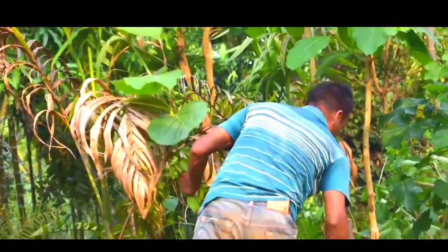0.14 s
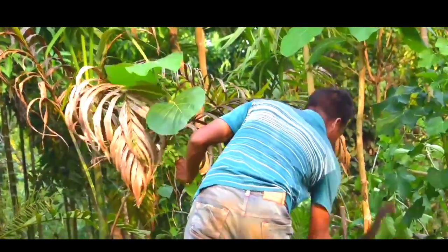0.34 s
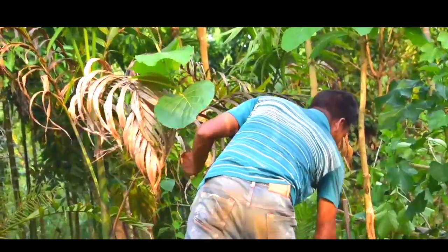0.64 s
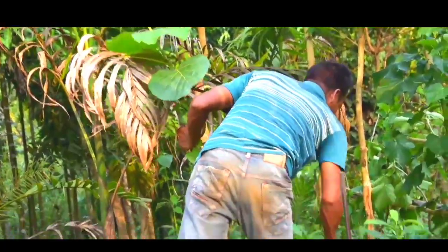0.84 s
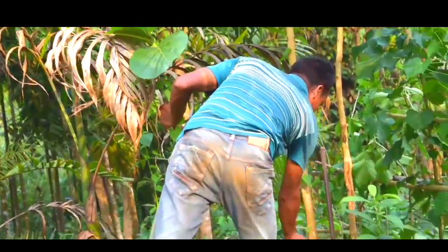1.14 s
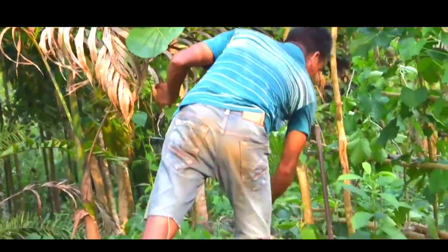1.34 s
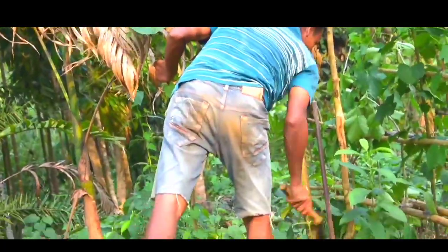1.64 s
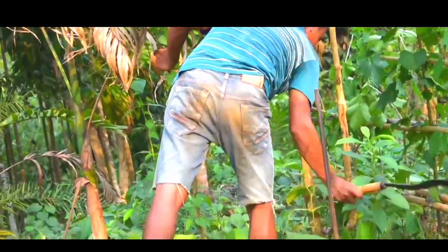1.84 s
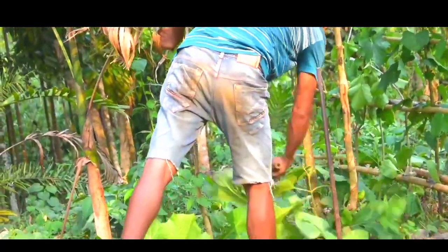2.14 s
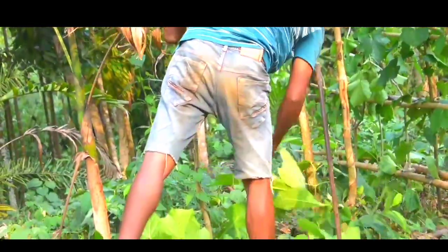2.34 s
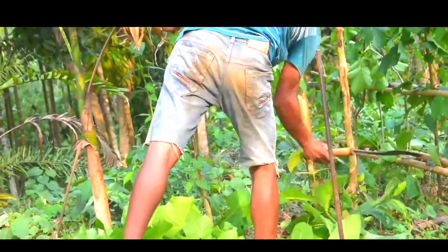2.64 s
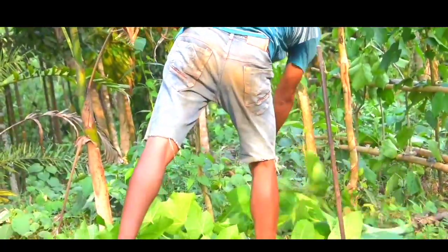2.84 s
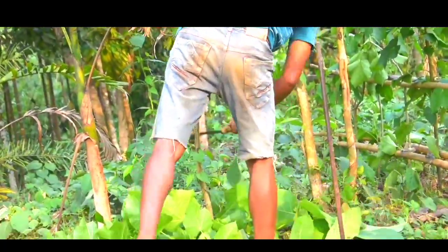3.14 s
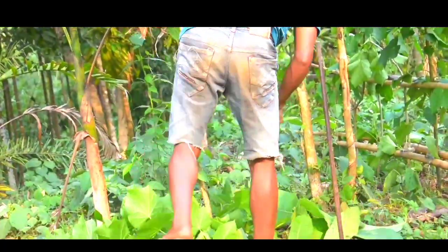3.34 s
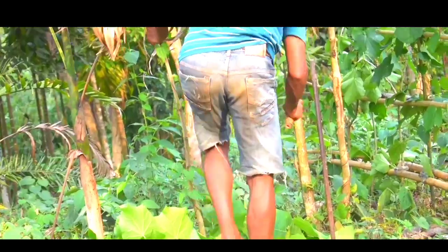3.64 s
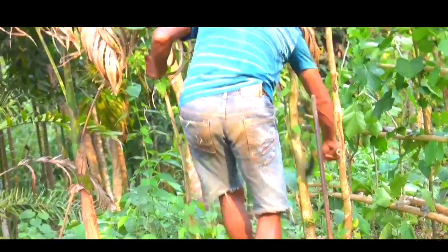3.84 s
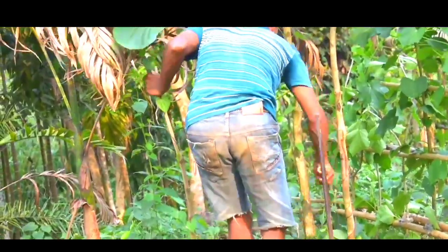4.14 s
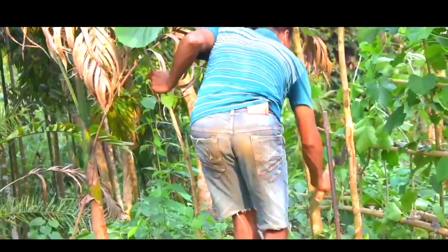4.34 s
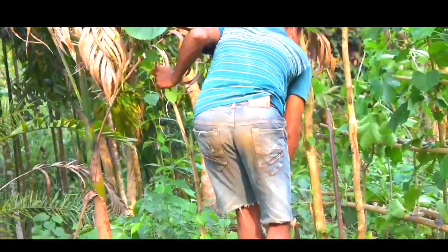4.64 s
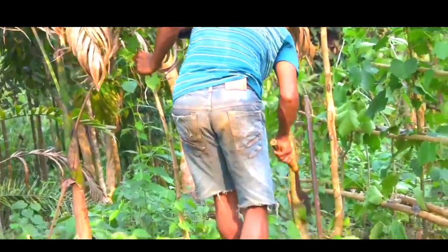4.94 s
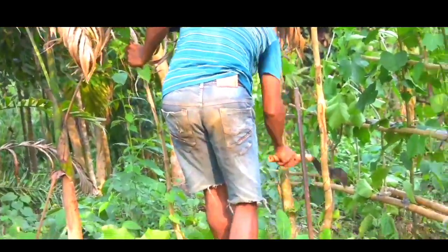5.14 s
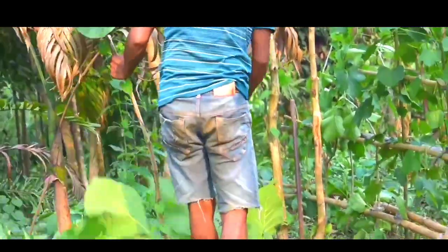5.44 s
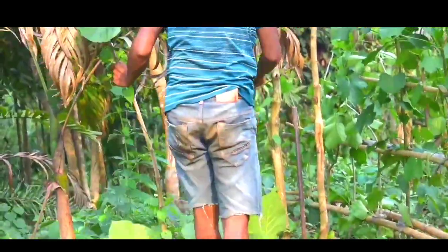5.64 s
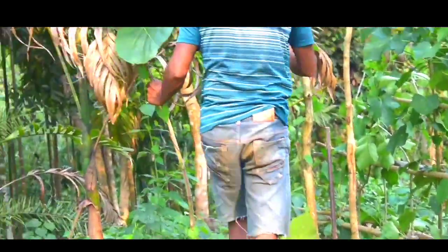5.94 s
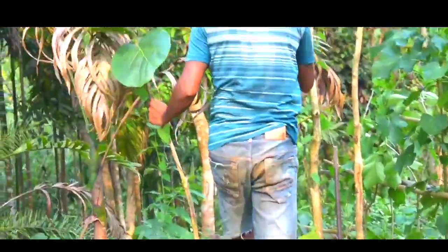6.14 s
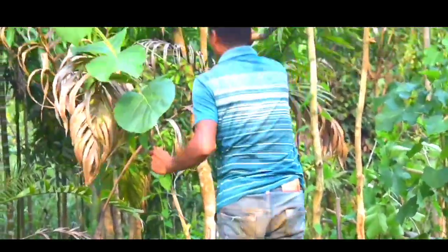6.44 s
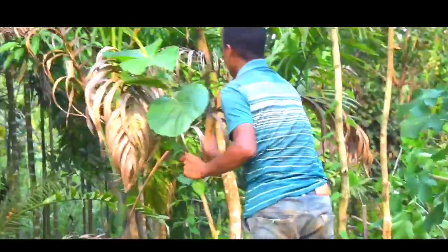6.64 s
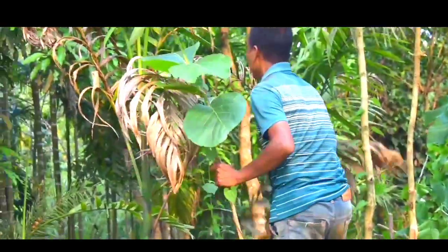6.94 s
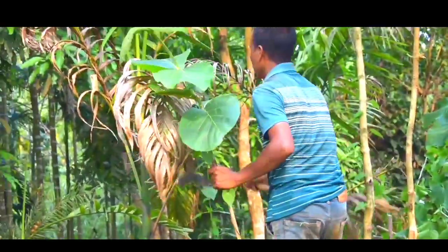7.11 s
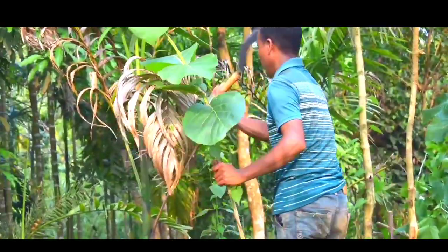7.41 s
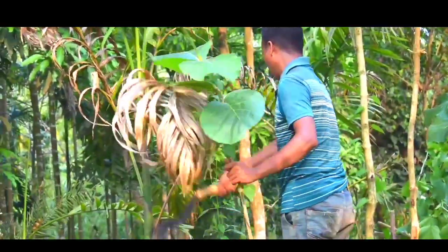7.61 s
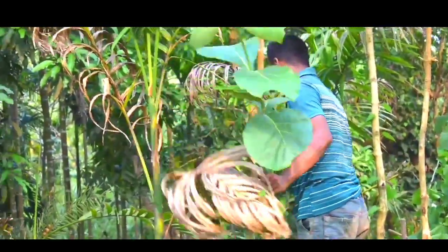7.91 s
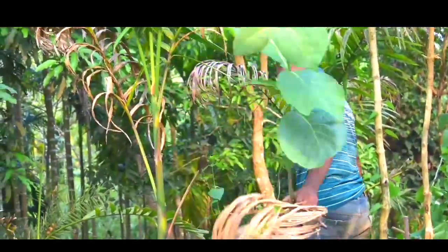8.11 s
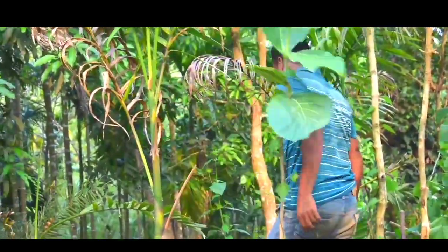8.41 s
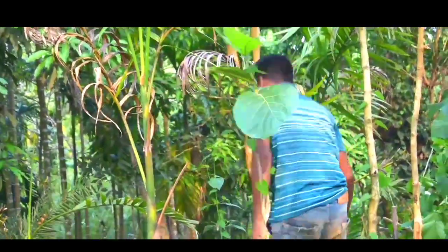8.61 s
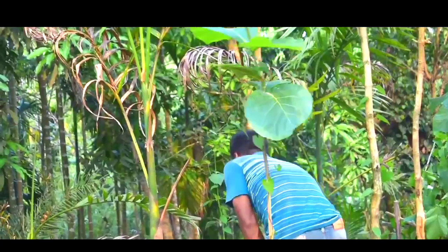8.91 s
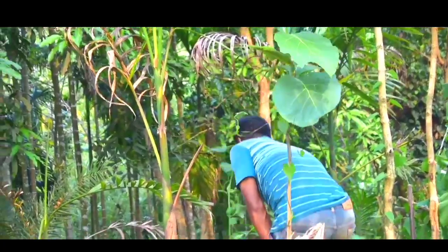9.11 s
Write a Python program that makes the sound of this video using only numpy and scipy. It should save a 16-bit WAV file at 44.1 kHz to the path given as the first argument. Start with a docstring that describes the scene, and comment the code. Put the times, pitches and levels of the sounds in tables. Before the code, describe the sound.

A few metres away in a forest, a machete slashes brush about once a second, each cut a sharp tearing crack with snapping stems and crisp leaf crackle. Midway the blade briefly squeals and rings along a stem. Later come two hard knocks on standing wood, then dragged fronds rustle and a dense final crash of leaves. Faint insects and canopy hiss; dry, centred mono sound.

```python
"""A machete slashes through brush and dry palm fronds a few metres from a mono camera microphone in a forest.
Leaves crackle in dense grains of noise; stems snap in short bursts of noise with decaying tones.
Two hard blows knock on a standing stem, the steel blade rings and once squeals along a stem in short grips.
A pole hums and a far bird chirps as gliding tones; insects and the canopy hiss behind it all as coloured noise."""
import sys
import numpy as np
from scipy import signal
from scipy.fft import rfft, irfft
from scipy.io import wavfile
from scipy.ndimage import uniform_filter1d

SR = 44100
rng = np.random.default_rng(int(sys.argv[2]) if len(sys.argv) > 2 else 0)


def store_pcm(level_fs):
    """Save levels as 16-bit WAV."""
    pcm = np.round(np.clip(level_fs, -1, 1) * 32767).astype(np.int16)
    wavfile.write(sys.argv[1], SR, np.atleast_2d(pcm).T)


N = 408807
TIME = np.arange(N) / SR

# tone colour of crackling leaves as the microphone hears them: pitch_hz [Hz], relative_level_db [dB per Hz]
LEAF_COLOUR = [(880, -36), (1500, -20.5), (1650, -12), (2240, -1.5), (2500, -10.5), (2840, -4.5),
               (3150, -7.5), (3700, -4), (4080, -5.5), (5260, 1.5), (5800, -1), (6220, -5), (6760, -4.5),
               (8000, -17), (10400, -56), (17600, -120)]
# tone colour of the crisp top of dry leaves: pitch_hz [Hz], relative_level_db [dB per Hz]
CRISP_COLOUR = [(6500, -22), (7800, 0), (10000, -4), (13000, -12), (15000, -28), (16000, -36)]


def gain(db):
    """Turn decibels into a factor for the wave's height."""
    return 10 ** (np.asarray(db) / 20)


def unit(x):
    """Scale a signal to an average (rms) level of 1."""
    return x / np.sqrt(np.mean(x ** 2))


def response(spectrum):
    """Filter of energy 1 that never sounds ahead of its input, shaped by points of pitch and level."""
    hz, db = np.transpose(spectrum)
    grid_hz = np.maximum(np.arange(2049) * SR / 4096, 1)
    level_db = np.interp(np.log(grid_hz), np.log(hz), db)
    # folding the cepstrum gives the minimum phase, so the filter acts at once
    cepstrum = irfft(np.log(gain(level_db)))
    cepstrum[1:2048] *= 2
    cepstrum[2049:] = 0
    h = irfft(np.exp(rfft(cepstrum)))[:2048]
    return h / np.sqrt(np.sum(h ** 2))


def colour(x, spectrum):
    """Give a signal the tone colour of a spectrum."""
    return signal.fftconvolve(x, response(spectrum))[:N]


def walk(rate_hz):
    """Random levels with a spread of 1, smoothly joined, with a new one rate_hz times a second."""
    step = int(SR / rate_hz)
    levels = rng.standard_normal(N // step + 1)
    return unit(uniform_filter1d(np.repeat(levels, step), step)[:N])


def grains(rate_hz, spread_db, tail_s):
    """Random tiny cracks, a few much louder than the rest, each a short burst of noise."""
    hit = (rng.random(N) < rate_hz / SR) * gain(spread_db * rng.exponential(size=N))
    keep = np.exp(-1 / (max(tail_s, 1e-4) * SR))
    power = signal.lfilter([1], [1, -keep], hit ** 2)
    return unit(np.sqrt(power) * rng.standard_normal(N))


def ring(x, hz, t60_s):
    """One ringing mode driven by x, dying by 60 dB in t60_s; a steady noise of level 1 comes out about 3 dB lower."""
    pole = np.exp(2j * np.pi * hz / SR - np.log(1000) / (t60_s * SR))
    return np.sqrt(1 - abs(pole) ** 2) * signal.lfilter([1], [1, -pole], x).imag


def swell(t, top_s, rise_s, hold_s, fall_s):
    """Level in dB: up to 0 at top_s, held, then down; rise and fall are times for 20 dB, at least 1 ms."""
    up = 20 * (t - top_s) / max(rise_s, 1e-3)
    down = -20 * (t - top_s - hold_s) / max(fall_s, 1e-3)
    return np.minimum(0, np.minimum(up, down))


def burst(shape, noise, spectrum):
    """Coloured noise under an envelope; the envelope, not chance, sets its energy."""
    x = signal.fftconvolve(shape * noise, response(spectrum))[:len(shape)]
    return x * np.sqrt(np.sum(shape ** 2) / np.sum(x ** 2))


def tone(note, arch, waver_db):
    """A single pitch that glides, swells in an arch and wavers in level."""
    start_s, length_s, first_hz, last_hz, level_db = note
    part = np.clip((TIME - start_s) / length_s, 0, 1)
    phase = 2 * np.pi * np.cumsum(first_hz + (last_hz - first_hz) * part) / SR
    envelope = np.abs(np.sin(np.pi * part)) ** arch * (part < 1)
    return np.sqrt(2) * envelope * gain(level_db + waver_db * walk(60)) * np.sin(phase)


def forest():
    """Far leaves of the canopy hiss steadily, swelling a little."""
    # tone colour of the hiss: pitch_hz [Hz], relative_level_db [dB per Hz]
    canopy_colour = [(15, -56), (25, -20.5), (122, -5.5), (221, -8.5), (290, -9.5), (484, -9.5), (633, -11),
                     (1060, -11), (1460, -15.5), (1670, -11), (1910, -14.5), (3360, -10.5), (3650, -13),
                     (4900, -7), (15600, -47)]
    level_db = -45 + 1.84 * walk(2.92)
    return gain(level_db) * colour(rng.standard_normal(N), canopy_colour)


def insects():
    """A far chorus blurs into a few narrow bands of hiss that drift in level."""
    # bands of the chorus: pitch_hz [Hz], drive_db [dB, middle level of the noise], t60_s [s to die by 60 dB]
    bands = [(3660, -58, 0.088), (5000, -57, 0.034), (5350, -56, 0.024), (5800, -68, .012)]
    return sum(gain(drive_db + 2.0 * walk(3.4)) * ring(rng.standard_normal(N), pitch_hz, t60_s)
               for pitch_hz, drive_db, t60_s in bands)


def bird():
    """A far bird chirps in short gliding tones with soft beginnings and ends."""
    # chirps: start_s [s], length_s [s], first_hz [Hz], last_hz [Hz], level_db [dB ahead of arch and waver]
    chirps = [(0.164, 0.026, 2550, 3110, -29.5), (3.4, 0.051, 1990, 2190, -45),
              (3.48, .035, 2060, 2170, -47), (3.614, .05, 2250, 2300, -42)]
    return sum(tone(chirp, arch=1.7, waver_db=2.5) for chirp in chirps)


def pole_hum():
    """A pole hums in tones that hold nearly steady between a quick swell and a quick fade."""
    # hums: start_s [s], length_s [s], first_hz [Hz], last_hz [Hz], level_db [dB ahead of arch and waver]
    hums = [(2.538, .145, 913, 920, -51.5), (2.69, .065, 913, 932, -48.5)]
    return sum(tone(hum, arch=0.23, waver_db=4.0) for hum in hums)


def squeal():
    """In each grip stick and slip lock to one rate, swell and let go; the next grip starts at a new phase."""
    # grips of a stem along the edge: middle_s [s], length_s [s from the middle to 1/e],
    # second_db, third_db [dB, 2nd and 3rd harmonic]
    grips = [(5.406, 0.021, -41, -53), (5.495, 0.022, -35, -40), (5.526, 0.0091, -25.5, -40),
             (5.539, 0.0077, -27, -35), (5.557, 0.0088, -26, -31), (5.578, 0.0095, -21, -33),
             (5.596, 0.0088, -22, -33), (5.627, .018, -29.5, -37), (5.656, 0.013, -38, -37),
             (5.682, 0.018, -38.5, -44), (5.733, 0.011, -36, -43), (5.751, 0.014, -34.5, -50),
             (5.81, 0.023, -37, -56), (5.9, .016, -45, -59), (5.86, .014, -46, -58), (5.986, .02, -50, -60),
             (6.06, .025, -51, -58)]
    slip_hz, slip_spread, first_re_second_db = 836.6, .005, -17
    out = np.zeros(N)
    chance = rng.standard_normal((len(grips), 4))
    for (middle_s, length_s, second_db, third_db), (tune, *start) in zip(grips, chance):
        i = slice(int((middle_s - .1) * SR), int((middle_s + .1) * SR))
        t = TIME[i] - middle_s
        hz = slip_hz * (1 + slip_spread * tune)
        envelope = np.exp(-(t / length_s) ** 2)
        for k, db in enumerate((second_db + first_re_second_db, second_db, third_db)):
            out[i] += gain(db) * envelope * np.sin(2 * np.pi * ((k + 1) * hz * t + start[k]))
    roughness = 1 + .35 * walk(250)
    return out * roughness


def blade(brush):
    """The steel rings in its bending modes when dragged over wood, and faintly whenever brush hits it."""
    # bending modes of the steel: pitch_hz [Hz], relative_level_db [dB], t60_s [s to die by 60 dB]
    modes = [(1547, 1.5, 0.12), (1620, -6.5, 0.34), (2750, 1, 0.14), (3144, 3, 0.072), (3780, -2.5, 0.45)]
    # one drag over wood: top_s [s], drive_db [dB], hold_s [s], fall_s [s for 20 dB]
    top_s, drive_db, hold_s, fall_s = (5.5, -46.5, 0.16, .5)
    drag = gain(drive_db + swell(TIME, top_s, 0.0054, hold_s, fall_s))
    hits = gain(-30.5) * brush
    out = np.zeros(N)
    for pitch_hz, level_db, t60_s in modes:
        drive = drag * grains(300, 1.6, 0.0015) + hits
        out += gain(level_db) * ring(drive, pitch_hz, t60_s)
    return out


def chops():
    """The edge bites for a few ms: fibres crack, the stem knocks, and its whole length rings low a little later."""
    # hard blows into a standing stem: hit_s [s], level_db [dB], wood_db, deep_db [dB re level_db],
    # bite_s [s from the start to the peak], low_hz [Hz, the knock sounds above it]
    blows = [(6.798, -2, -6.5, -28, 0.002, 470), (7.6136, -1, -7, -48, 0.0023, 960)]
    # ringing modes of the knock: pitch_hz [Hz], relative_level_db [dB], t60_s [s to die by 60 dB]
    trunk_modes = [(655, -27, 0.055), (1000, -13, 0.05), (1345, 4, 0.014), (1815, 5, 0.012),
                   (2200, -14, .035)]
    # low ring of the whole stem: pitch_hz [Hz], t60_s [s to die by 60 dB]
    deep_hz, deep_t60_s = (235, 0.26)
    t = np.arange(4096) / SR
    crack, wood = np.zeros((2, N))
    chance = rng.standard_normal((len(blows), 2, len(t)))
    for (hit_s, level_db, wood_db, deep_db, bite_s, low_hz), (fibres, push) in zip(blows, chance):
        first = int((hit_s - .001) * SR)
        i = slice(first, first + len(t))
        bite = t / bite_s * np.exp(1 - t / bite_s)
        crack[i] = gain(level_db - 5.5) * burst(bite, fibres, LEAF_COLOUR)
        crack[i] += gain(level_db - 18) * burst(bite, fibres, CRISP_COLOUR)
        knock = sum(gain(db) * ring(bite * push, hz, t60_s) for hz, db, t60_s in trunk_modes)
        knock = signal.sosfilt(signal.butter(4, low_hz, "high", fs=SR, output="sos"), knock)
        # the knock gets the energy of the bite
        knock *= np.sqrt(np.sum(bite ** 2) / np.sum(knock ** 2))
        arch = np.sin(np.pi * t / t[-1]) ** 0.78
        deep = gain(deep_db - 60 * t / deep_t60_s) * arch * np.sin(2 * np.pi * deep_hz * t)
        wood[i] = gain(level_db) * (gain(wood_db) * knock + deep)
    return crack + wood


def crisp_db():
    """How dry and bright the leaves in motion are, as a level in dB that drifts with time."""
    # crisp top of the leaves: time_s [s], level_db [dB re the rustle]
    crisp_points = [(0, -17), (.5, -20), (1.3, -16), (1.7, -14), (2.2, -16.5), (2.9, -16.5), (3.4, -17.5),
                    (4.0, -14.5), (4.4, -15.5), (4.9, -12.5), (5.4, -16.5), (6.0, -17.5), (6.45, -17.5),
                    (6.85, -15.5), (7.3, -15.5), (8.0, -16.5), (8.6, -16), (9.27, -16)]
    return np.interp(TIME, *np.transpose(crisp_points))


def snaps():
    """Each break is a tearing burst with a weaker shiver of leaves after it; twig and stem ring briefly."""
    # snaps and blows: hit_s [s], level_db [dB], stem_hz [Hz], stem_db [dB re level_db],
    # twig_hz [Hz], twig_db [dB re level_db]
    breaks = [(0.1663, -18, 334, -27, 1010, -6.5), (.1762, -17, 266, -26, 1140, -17),
              (.192, -16, 366, -38, 1650, -12), (0.3676, -18.5, 490, -28, 939, -18),
              (.408, -22.5, 357, -25, 1480, -7.5), (0.495, -10, 385, -27, 1070, -4),
              (0.5185, -8, 444, -29, 1020, -16), (1.2453, -9.5, 372, -17, 1620, -9),
              (1.2579, 1, 281, -14, 990, -17), (1.271, 1, 221, -34, 1690, -17),
              (2.0667, -4.5, 450, -27, 1200, -31), (2.0843, -0.4, 436, -28, 1750, -11),
              (2.0999, 5, 407, -25.5, 1150, -19), (2.202, -10, 425, -36, 1260, -23),
              (2.5096, -17, 361, -23, 1310, -10), (2.5804, -14, 312, -33, 926, -26),
              (2.6464, -23, 395, -29, 894, -17), (2.8285, -8, 371, -32, 1700, -36),
              (2.8484, -2.5, 385, -16, 1700, -25), (2.8665, -1, 453, -24, 1600, -14),
              (2.8903, -5, 353, -27, 1790, -7), (3.084, -21, 350, -28.5, 1300, -22),
              (3.3494, -18.5, 207, -22, 1740, -11), (3.639, -19, 371, -32, 1160, -22),
              (3.8262, -16.5, 417, -36, 1290, -11), (3.8672, 1.5, 477, -44, 1080, -27),
              (3.976, -7.5, 312, -15.5, 1500, -29), (3.9869, -0.5, 348, -36, 1240, -26),
              (3.9994, -1.5, 408, -43, 960, -23), (4.0209, -5, 466, -40, 840, -10),
              (4.0314, -7, 466, -37, 1620, -14), (4.051, -7.5, 377, -38, 1530, -11),
              (4.0805, -2.5, 368, -44, 1220, -11.5), (4.1162, -6.5, 450, -41, 1530, -11),
              (4.3452, -8, 310, -41, 1300, -10), (4.3896, -13.5, 266, -35, 1200, -19),
              (4.4176, -15.5, 420, -23, 1680, -16), (4.5342, -19, 374, -16, 1350, -6),
              (4.596, -4.5, 296, -30, 1300, -15), (4.624, -9, 350, -31, 1200, -25),
              (4.6752, -20, 444, -35, 1680, -7), (4.71, -8, 275, -33, 1000, -24),
              (5.0615, -22.5, 288, -29, 840, -22), (5.4234, -19, 221, -15, 1080, -17),
              (5.4439, -18, 415, -31, 1680, -16), (5.4596, -11.5, 470, -24, 950, -21),
              (6.1436, -16, 403, -35, 1670, -26.5), (6.34, -7.5, 370, -22.5, 1750, -16),
              (6.3667, -2, 450, -22.5, 740, -12.5), (6.373, -9, 527, -22, 1350, -9),
              (6.4008, -12, 515, -32, 1090, -12), (6.4132, -7, 253, -38, 1620, -5.5),
              (6.431, -10, 476, -43, 1470, -15.5), (6.4533, 1, 280, -46, 1340, -19),
              (6.4804, -4.5, 425, -33, 1370, -5.5), (6.498, -6, 366, -27, 1310, -13),
              (6.554, -17, 369, -31, 1500, -19.5), (6.6398, -14, 191, -28, 1070, -21),
              (6.6868, -18, 253, -28, 1060, -24), (7.0305, -23, 304, -24.5, 1040, -12),
              (7.0616, -19.5, 401, -17, 1580, -18), (7.5193, -14.5, 194, -37, 1460, -14),
              (7.8171, -17.5, 194, -29.5, 1290, -16), (8.1769, -18, 191, -5.5, 1255, -2),
              (8.181, -22.5, 402, -5, 760, -0.5), (8.2727, -19, 361, -19, 894, -24),
              (8.332, -20, 490, -30, 1400, -13), (8.3532, -18, 378, -18, 1520, -25),
              (8.4791, -20, 258, -13.5, 1330, -19), (8.7643, -5.5, 352, -28, 1390, -20),
              (9.065, -13, 364, -18.5, 1290, -21), (9.1158, -5.5, 393, -27, 1540, -11.5),
              (9.1473, 0.5, 264, -22, 1280, -14.5), (9.1611, 0, 324, -14.5, 1370, -23),
              (9.1774, -4, 450, -18, 1370, -19)]
    rise_s, shiver_db, shiver_slower = .0003, -16, 6.4
    second_hz, second_db = 2124, -2  # higher ring at one fixed pitch, its level relative to the twig
    t = np.arange(8192) / SR
    chance = rng.standard_normal((len(breaks), 2, len(t)))
    tear, top, wood = np.zeros((3, N + len(t)))
    fall_db = -60 * t / 0.021  # the tear dies by 60 dB in 21 ms
    rise = 1 - np.exp(-t / rise_s)
    shape = rise * (gain(fall_db) + gain(shiver_db + fall_db / shiver_slower))
    for (hit_s, level_db, stem_hz, stem_db, twig_hz, twig_db), (noise, splinter) in zip(breaks, chance):
        first = int((hit_s - rise_s) * SR)
        i = slice(first, first + len(t))
        tear[i] += gain(level_db) * burst(shape, noise, LEAF_COLOUR)
        top[i] += gain(level_db) * burst(shape, noise, CRISP_COLOUR)
        # splintering fibres roughen the twig's ring
        rough = 1 + 2.05 * uniform_filter1d(splinter, size=24)
        twig = gain(twig_db + fall_db / 0.73) * rough * np.sin(2 * np.pi * twig_hz * t)
        second = gain(twig_db + second_db + fall_db / 0.83) * np.sin(2 * np.pi * second_hz * t)
        stem = gain(stem_db + fall_db / 1.94) * np.sin(2 * np.pi * stem_hz * t)
        wood[i] += gain(level_db) * rise * (twig + second + stem)
    # the microphone passes little deep bass
    wood = signal.sosfilt(signal.butter(2, 140, "high", fs=SR, output="sos"), wood[:N])
    return gain(-10.5) * tear[:N] + gain(-7.5 + crisp_db()) * top[:N] + wood


def strokes():
    """Levels in dB of leaves, stems and twigs over time: rustles and slashes add in power."""
    # leaves set in motion by arm, foot, backswing or a pulled frond: top_s [s], level_db [dB],
    # rise_s [s for 20 dB], hold_s [s], fall_s [s for 20 dB], thud_db, knock_db [dB re level_db, stems and twigs]
    rustles = [(0.0, -38.5, .01, 0.003, 0.1, -19, -8), (0.125, -31.5, .13, 0.032, 0.15, -19, -12),
               (0.406, -44, -1, .03, 3, -19, -9), (0.823, -37.5, 0.35, 0.039, .35, -19, -19),
               (1.19, -44.5, 1, .02, 2, -16, -16), (1.44, -40.5, 0, 0.017, 0.4, -15, -16),
               (1.646, -27.5, 0.18, 0.045, 0.13, -17.5, -15), (1.85, -47, 0, .15, 1, -15, -12),
               (2.199, -19.5, 0.03, 0.01, 0.08, -17, -12.5), (2.3, -37.5, 0.3, 0.014, 0.2, -18, -18),
               (2.54, -38, 0.1, 0.022, 0.2, -14.5, -12.5), (2.79, -42.5, .3, 0.051, 0.86, -17, -10),
               (3.06, -42, -0.2, 0.0092, 1, -24, -23), (3.35, -40.5, -0.2, .006, -0.24, -11, -19),
               (3.434, -42.5, 0.8, 0.0088, 0, -16, -25), (3.582, -43, 0, .02, .1, -15, -12),
               (3.617, -35.5, -0.05, 0.012, 0.35, -23, -16), (3.81, -32, 0.1, 0.004, .1, -16, -15.5),
               (3.904, -30, 0.05, .03, 0.24, -11, -15), (3.971, -20.5, 0.11, 0.0062, 0.19, -17.5, -15.5),
               (4.078, -30, 0.06, 0.02, 0.35, -31, -11.5), (4.349, -35, 0.1, .035, 0.17, -31, -7.5),
               (4.577, -28, 0.1, .012, 0, -15, -12.5), (4.671, -26.5, -0.03, 0.026, 0.5, -22.5, -16.5),
               (4.9, -36.5, 0.1, 0.06, 0, -22, -31.5), (5.055, -36.5, -1.8, 0.011, -0.55, -22, -20),
               (5.398, -35, -0.03, 0.022, .1, -20, -19), (5.436, -27, 0.03, 0.037, 0.02, -19, -17),
               (5.658, -35.5, .4, 0.0067, 0.42, -18.5, -11.5), (6.163, -38, 0.34, .01, 0.3, -20, -13.5),
               (6.323, -32.5, 0.12, 0.047, -0.06, -12, -10.5), (6.433, -25, 0.07, 0.037, 0.18, -32, -12.5),
               (6.6, -38.5, 0.2, .12, 0.5, -21, -15), (6.945, -35, 0.15, 0.23, 1, -20, -14.5),
               (7.251, -23.5, 0.24, 0.011, 0.2, -18, -16.5), (7.522, -33.5, 0.2, .01, 0.06, -28, -18.5),
               (7.686, -31, 0.27, 0.11, 0.53, -26.5, -13.5), (8.081, -36.5, 0, 0.04, 0.2, -30, -16),
               (8.173, -34, 0.35, 0.05, 0.15, -17.5, -16.5), (8.272, -35, .08, 0.011, 0.5, -20, -17),
               (8.348, -25.5, -0.07, 0.039, 0.15, -22, -16), (8.472, -34.5, -0.1, .02, .2, -18, -13),
               (8.542, -27, 0.15, 0.23, 0.05, -19, -16.5), (8.788, -20.5, 0.1, 0.021, 0.1, -21, -16),
               (8.91, -40, -4, 0.061, .4, -21, -16), (8.986, -32.5, 0.1, 0.027, 0.4, -19.5, -15),
               (9.151, -13, 0.03, 0.0089, 0.18, -14, -10.5), (9.224, -16, -0.0161, .008, 0, -30, -16)]
    # slashes of the blade through brush: top_s [s], level_db [dB], hold_s [s], fall_s [s for 20 dB],
    # thud_db, knock_db [dB re level_db, stems and twigs]
    slashes = [(0.493, -18.5, 0.067, 0.21, -14.5, -13.5), (1.241, -19, .05, .2, -12.5, -12.5),
               (2.071, -17.5, 0.047, 0.13, -16.5, -12), (2.832, -15.5, 0.062, 0.1476, -16.5, -15),
               (4.595, -17.5, 0.011, .1, -18, -16), (6.806, -24.5, .012, 0.18, -25, -10.5),
               (7.619, -19, .007, 0.07, -14, -14), (9.068, -23.5, .035, 3, -21, -20)]
    slash_rise_s = .004  # for 20 dB
    moves = rustles + [(top_s, level_db, slash_rise_s, *rest) for top_s, level_db, *rest in slashes]
    t = TIME[::32]
    power = np.full((3, len(t)), 1e-12)
    # stems and twigs rise and fall more steeply in dB than the leaves
    steep = np.array([[1], [1.27], [1.09]])
    for top_s, level_db, rise_s, hold_s, fall_s, thud_db, knock_db in moves:
        shape = gain(swell(t, top_s, rise_s, hold_s, fall_s))
        levels_db = level_db + np.array([[0], [thud_db], [knock_db]])
        power += (gain(levels_db) * shape ** steep) ** 2
    return [np.interp(TIME, t, 10 * np.log10(p)) for p in power]


def leaves():
    """Moved and slashed leaves, twigs and stems crackle in clusters that they all share."""
    # tone colour of the stems' thud: pitch_hz [Hz], relative_level_db [dB per Hz]
    thud_colour = [(40, -33), (90, -15), (150, -6), (220, -3.5), (320, -0.5), (420, 0.5), (520, -10.5),
                   (700, -25.5)]
    # tone colour of the twigs' knock: pitch_hz [Hz], relative_level_db [dB per Hz]
    knock_colour = [(450, -32), (700, -2.5), (1000, 3.5), (1300, 3.5), (1600, 2.5), (2000, -26)]
    rustle_db, thud_db, knock_db = strokes()
    cluster_db = 0.72 * walk(70) + 0.54 * walk(20)
    crackle = gain(rustle_db + cluster_db) * grains(3500, 1.6, .0009)
    leaf = colour(crackle, LEAF_COLOUR)
    crisp = colour(gain(crisp_db() + 0.32 * walk(6.9)) * crackle, CRISP_COLOUR)
    twig_level = gain(cluster_db + knock_db + 0.85 * walk(15))
    twig = colour(twig_level * grains(900, 0.86, 0.0013), knock_colour)
    stem_level = gain(cluster_db + thud_db + 1.1 * walk(17))
    stem = colour(stem_level * grains(900, 1.5, 0.002), thud_colour)
    return leaf + crisp + twig + stem


def scene():
    """Add all sources and send the same sum to both channels."""
    background = forest() + insects() + bird() + pole_hum()
    brush = leaves() + snaps() + chops()
    mono = background + squeal() + blade(brush) + brush
    return np.array([mono, mono])


def record(dry):
    """The recorder rounds the loudest blows at full scale and cuts the top."""
    rounded = dry / (1 + np.abs(dry) ** 6) ** (1 / 6)
    top_cut = signal.ellip(14, .2, 90, 15760, fs=SR, output="sos")  # ripple dB, rejection dB, edge Hz
    return signal.sosfilt(top_cut, rounded)


dry = scene()
out = record(dry)
store_pcm(out)
```